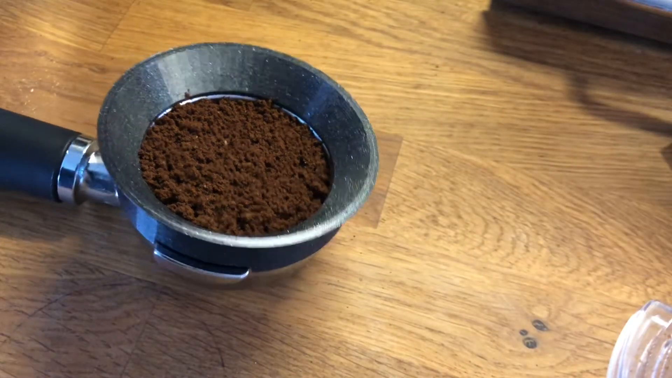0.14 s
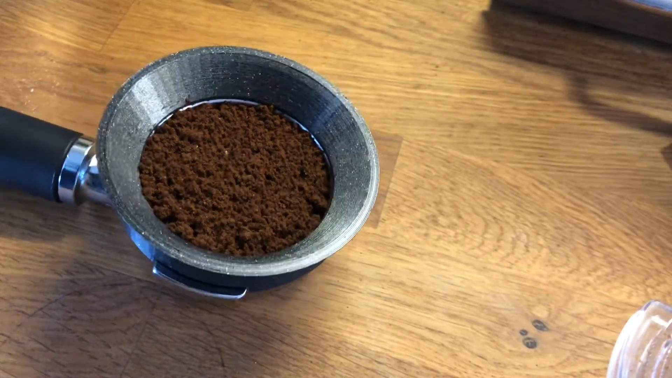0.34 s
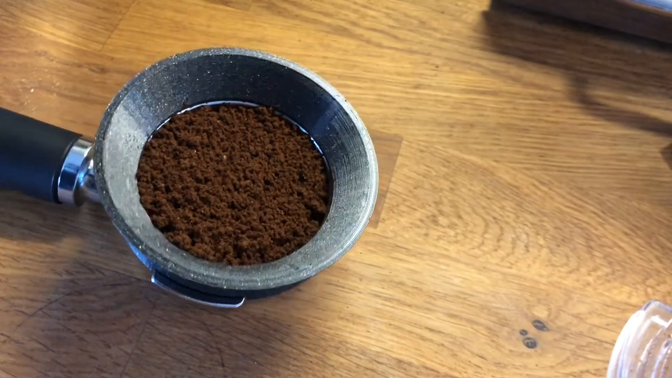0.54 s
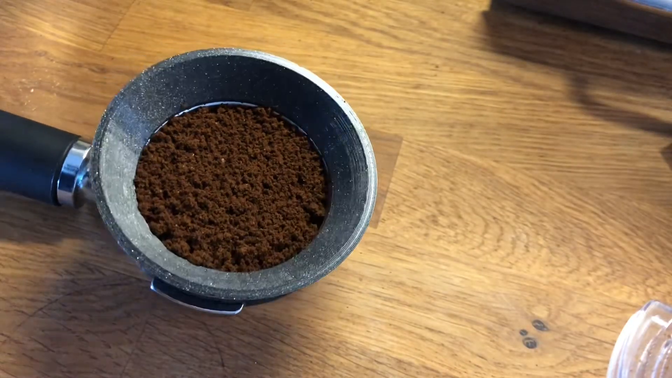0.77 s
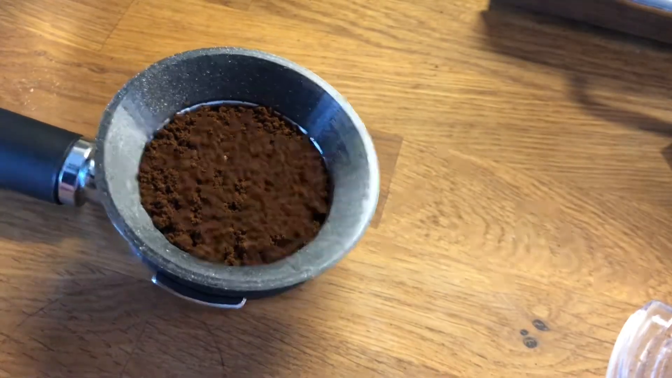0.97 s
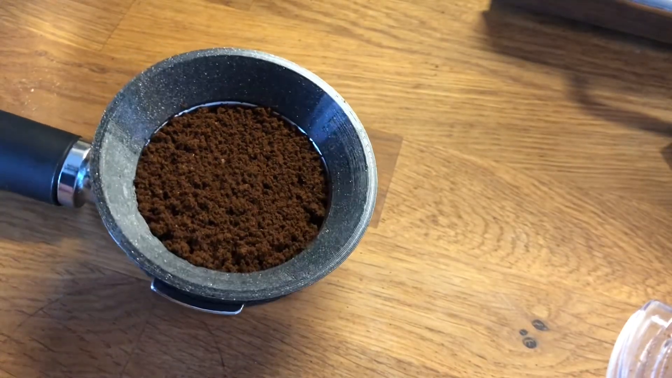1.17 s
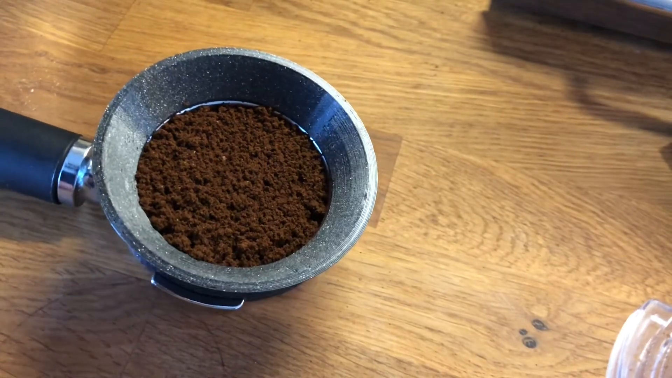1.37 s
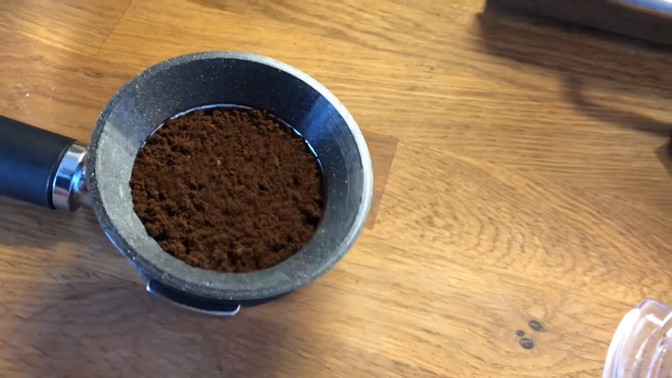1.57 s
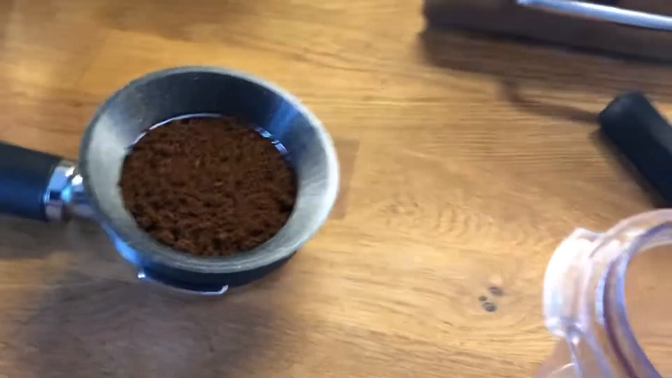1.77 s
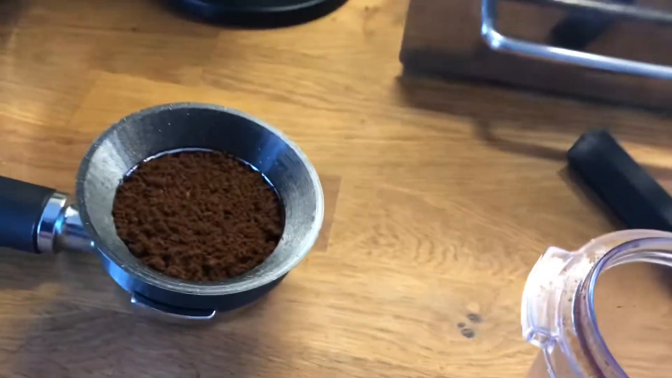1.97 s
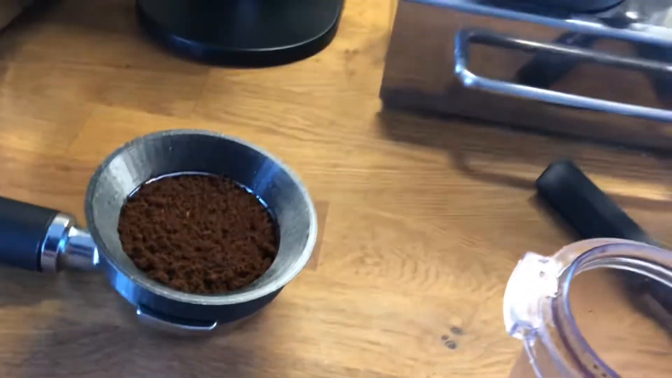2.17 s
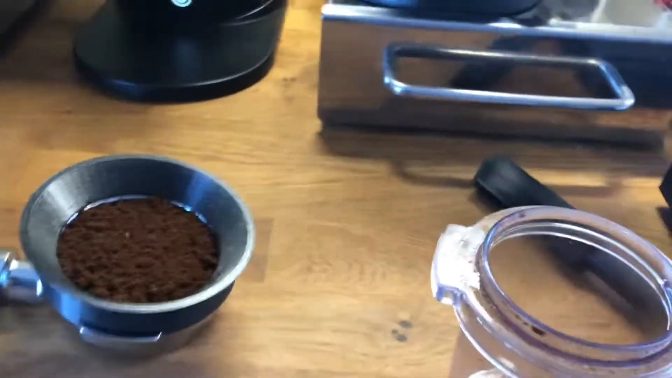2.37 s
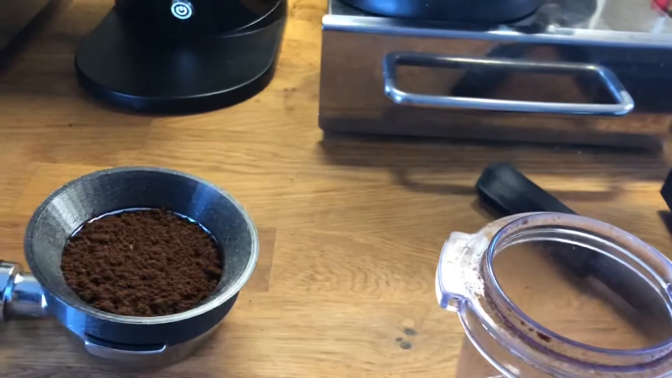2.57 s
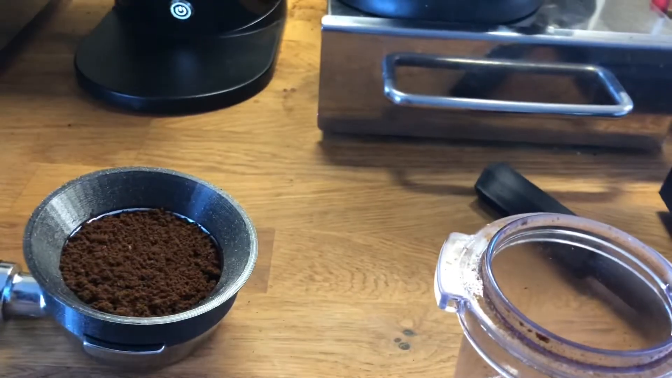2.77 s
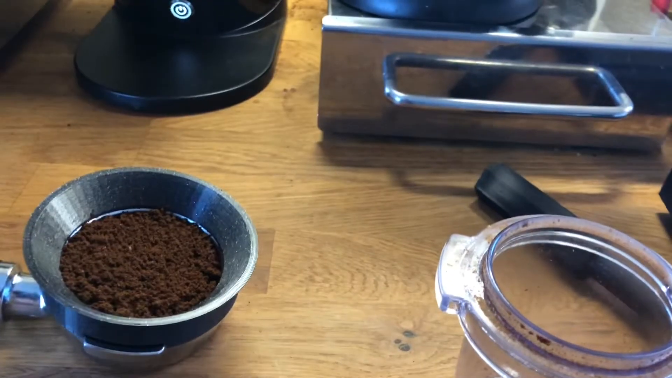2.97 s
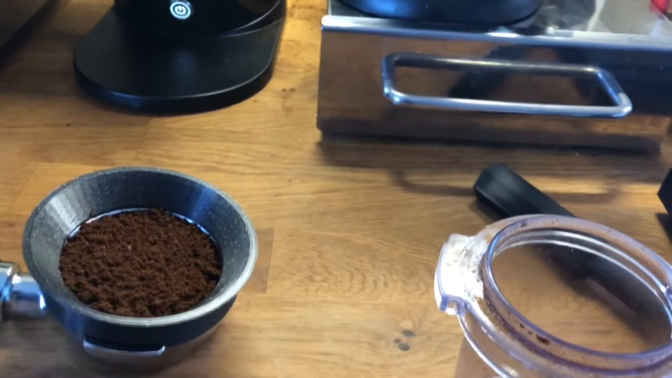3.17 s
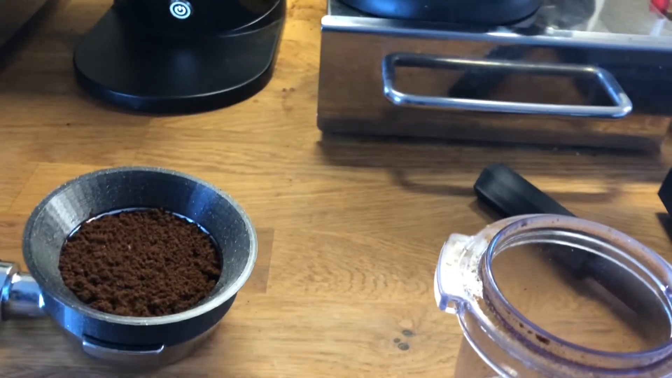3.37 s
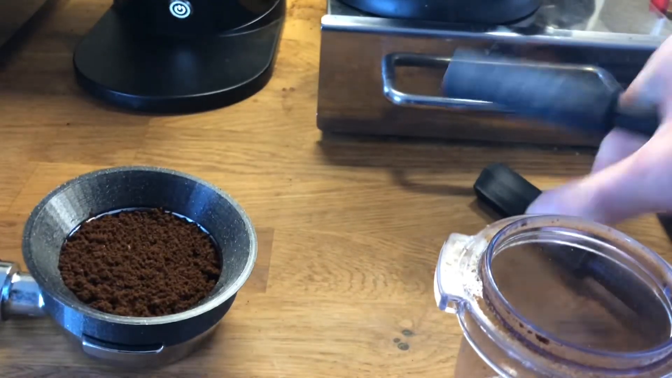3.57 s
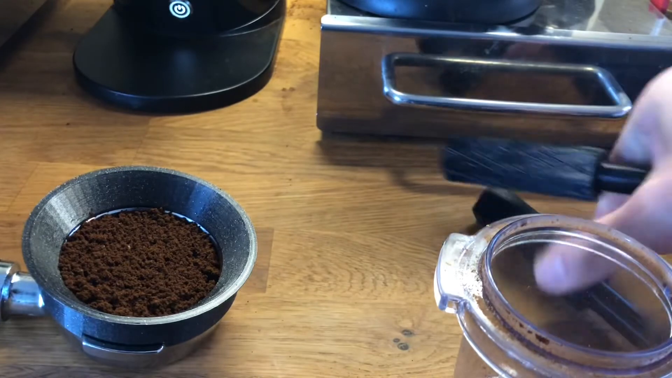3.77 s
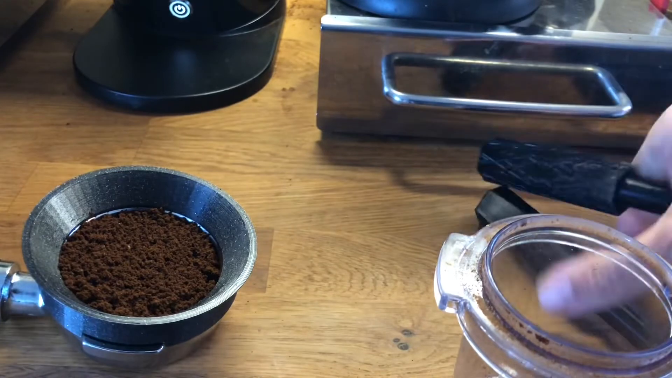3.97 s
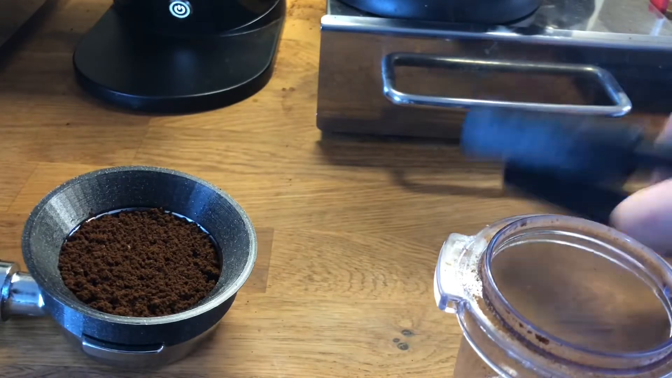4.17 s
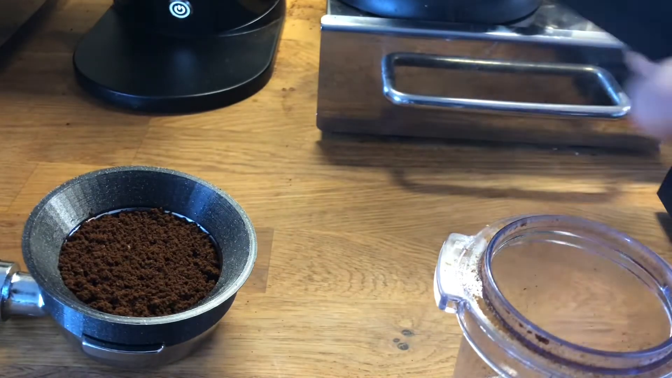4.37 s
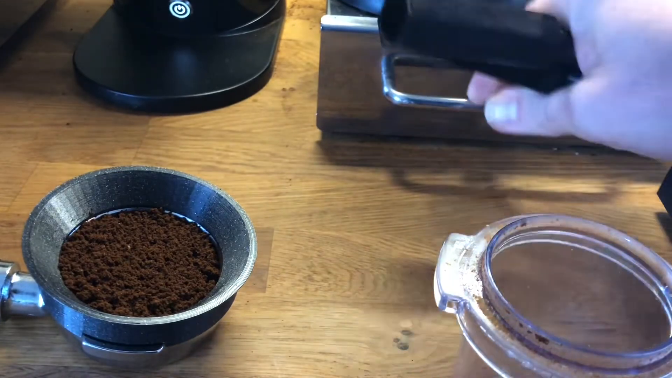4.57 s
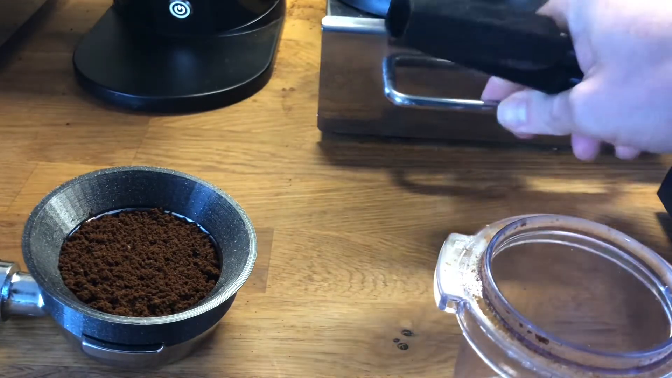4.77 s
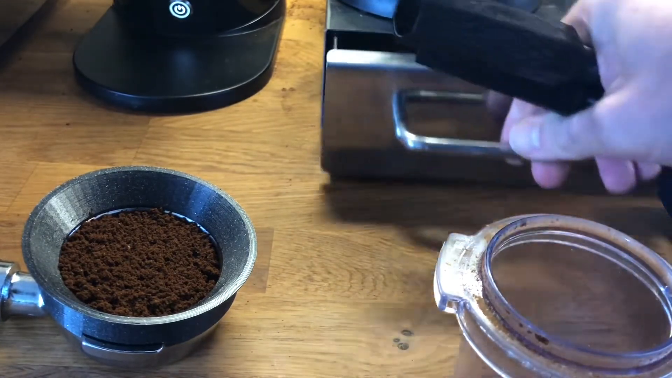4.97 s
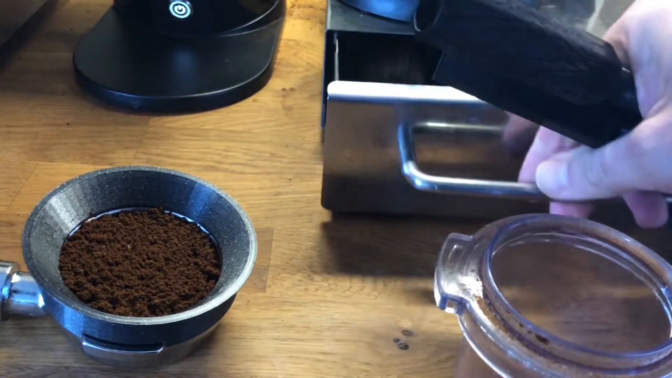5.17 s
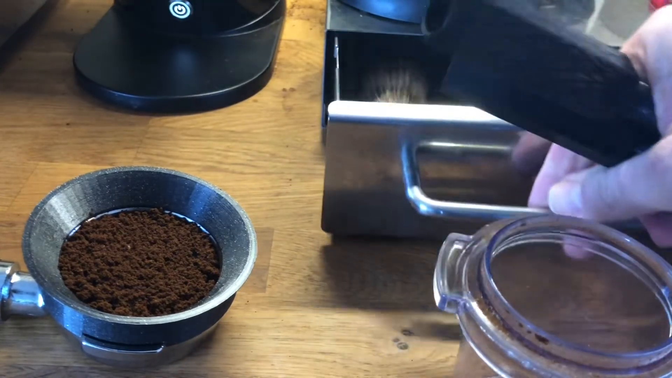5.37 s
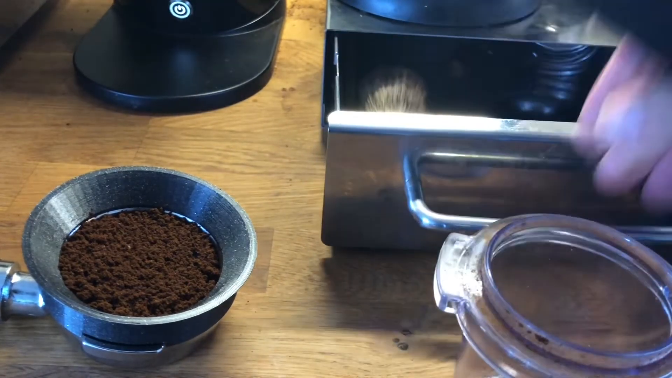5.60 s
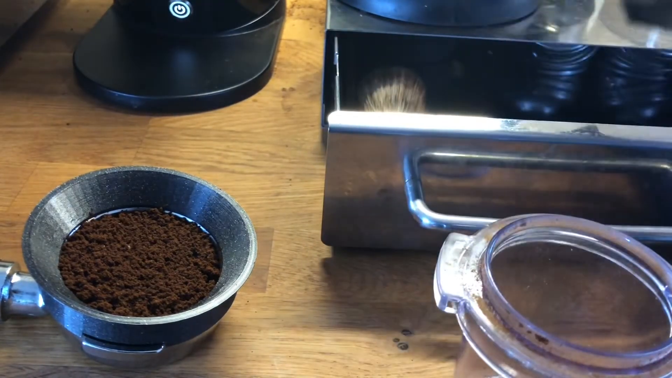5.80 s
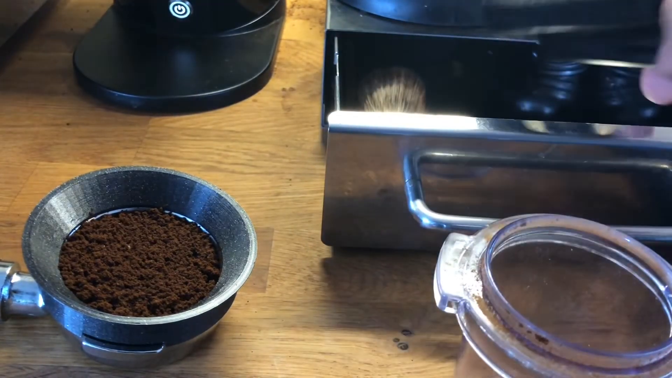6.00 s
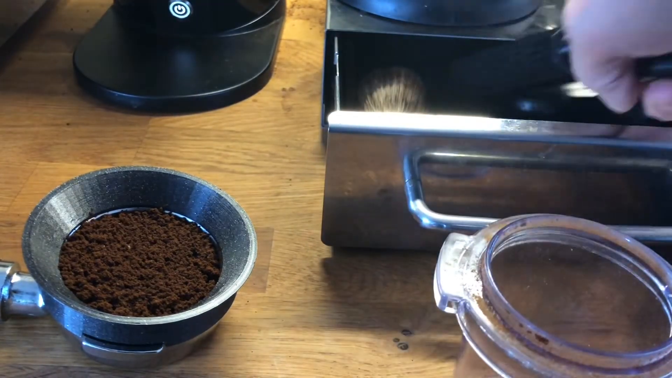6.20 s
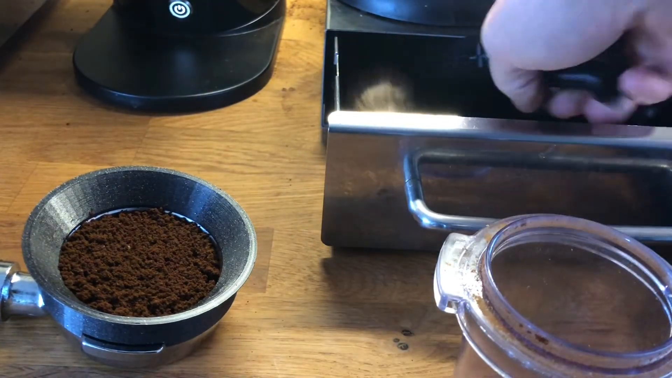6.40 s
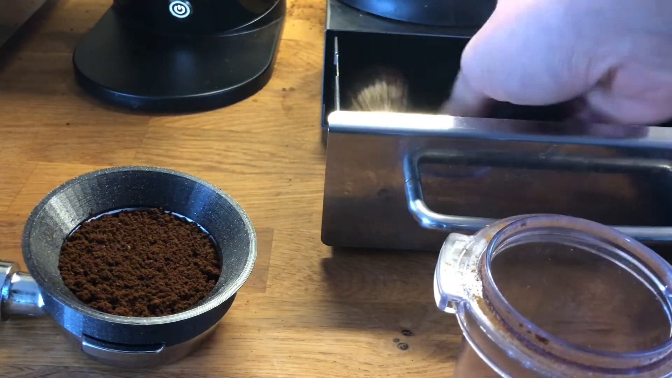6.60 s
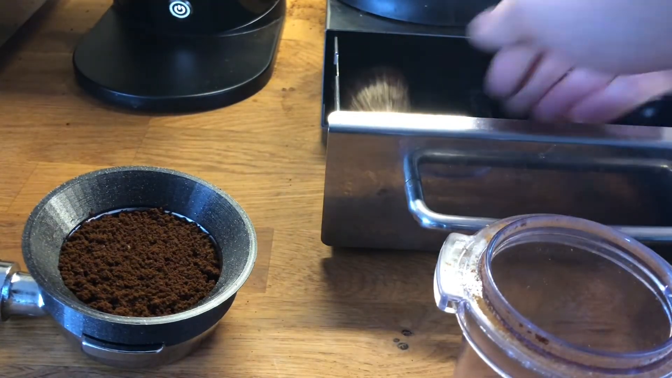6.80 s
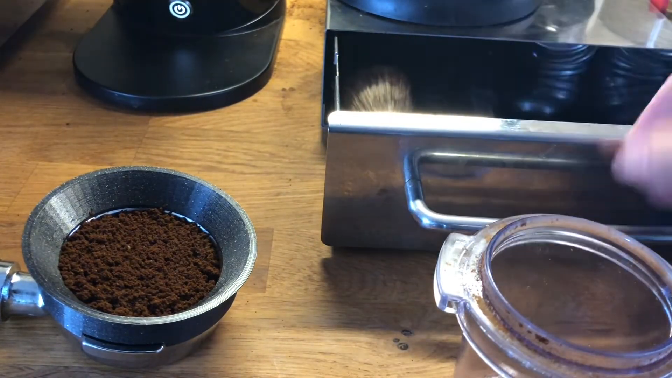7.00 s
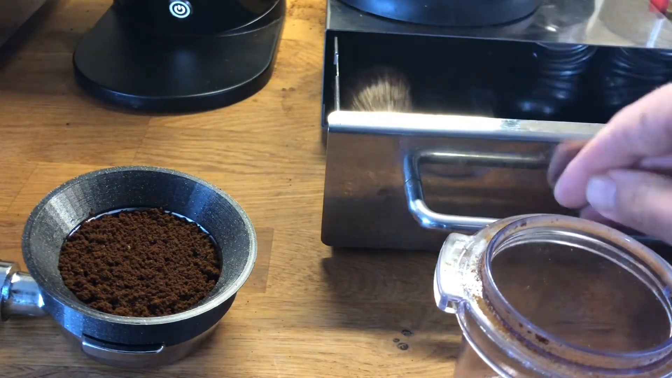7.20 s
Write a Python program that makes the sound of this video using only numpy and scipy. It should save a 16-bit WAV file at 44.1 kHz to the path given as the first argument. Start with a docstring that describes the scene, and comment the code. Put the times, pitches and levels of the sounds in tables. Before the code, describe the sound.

Close view of a quiet kitchen counter with faint low hum. A dull wooden thud, tiny taps, a short stuttering scrape and a sharper knock come first, then a soft slide. Two hard plastic tools clack together around four seconds. A steel drawer rumbles open with knocks, and the tools drop into it with loud, bright metallic clatter, fading in the small room. Small, slightly thin mono microphone.

```python
"""Small, quiet kitchen: small things are set down on a wooden counter and a stand is slid over it.
Two plastic tools are picked up and clack together; a steel drawer is pulled open and they drop into it.
Blows are short noisy pushes, slides are streams of tiny slips; both drive the resonances of the things.
The room answers with a decaying noise tail, over filtered-noise room tone and a low rumble."""
import sys
import numpy as np
from scipy import signal
from scipy.fft import rfft, irfft
from scipy.io import wavfile

SR = 44100
rng = np.random.default_rng(int(sys.argv[2]) if len(sys.argv) > 2 else 0)


def digitize_waveform(pressure):
    """Quantize a signal to 16-bit integers and store it at the path in sys.argv[1].

    Rows of a 2-D input are taken as channels; values are limited to [-1, 1].
    """
    field = np.atleast_2d(pressure).T
    bounded = np.clip(field, -1, 1)
    quanta = np.round(bounded * 32767).astype(np.int16)
    wavfile.write(sys.argv[1], SR, quanta)


N = 319725


def from_db(db):
    """Decibels to amplitude gain."""
    return 10 ** (np.asarray(db) / 20)


def rms_one(x):
    """Scales to unit rms."""
    return x / np.sqrt(np.mean(x ** 2) + 1e-30)


def at_hz(points, hz):
    """Interpolates (frequency [Hz], value) points on a log-frequency axis."""
    points = np.array(sorted(points))
    return np.interp(np.log(hz), np.log(points[:, 0]), points[:, 1])


def band(x, low_hz, high_hz):
    """Second-order Butterworth band-pass."""
    sos = signal.butter(2, [low_hz, high_hz], "band", fs=SR, output="sos")
    return signal.sosfilt(sos, x)


def drift(rate_hz):
    """Slow random wander of unit rms: noise through a two-pole low-pass, its start-up dropped."""
    r = np.exp(-2 * np.pi * rate_hz / SR)
    wander = signal.lfilter([1], [1, -2 * r, r * r], rng.standard_normal(N + SR))
    return rms_one(wander[SR:])


# room tone spectrum: (frequency [Hz], relative density [dB])
HUM_SPECTRUM = [(15, -33.5), (25, -8.5), (114, 3.5), (190, 4), (236, -0.5), (317, 0), (503, -8), (911, -16),
                (988, -14), (1700, -20), (4740, -24), (14800, -32.5), (16000, -32.5)]


def hum():
    """Room tone: noise shaped in the spectrum, wavering a little in level."""
    level_db, waver_db, waver_hz = -62.5, 1.2, 4
    hz = np.maximum(np.arange(N // 2 + 1) * SR / N, 1)
    spectrum = rfft(rng.standard_normal(N)) * from_db(at_hz(HUM_SPECTRUM, hz))
    tone = rms_one(irfft(spectrum, N))
    return from_db(level_db) * from_db(waver_db * drift(waver_hz)) * tone


# low rumble through the counter: (time [s], level [dB])
RUMBLE_LEVEL = [(0, -82.5), (1.9, -76), (2.4, -66.5), (3.1, -60), (3.502, -96), (4.249, -75), (5.35, -52.5),
                (5.65, -75)]


def rumble():
    """Low rumble through the counter: bass noise under a slow level curve."""
    time_s, level_db = np.transpose(RUMBLE_LEVEL)
    noise = rms_one(band(band(rng.standard_normal(N), 40, 130), 30, 130))
    return from_db(np.interp(np.arange(N) / SR, time_s, level_db)) * noise


def echoes(decays):
    """Noise tail of unit energy, dying band by band after (frequency [Hz], t60 [s]) points."""
    onset_s = 0.0016   # the first answers come late
    t = np.arange(SR // 2) / SR
    edges_hz = np.geomspace(60, 18000, num=13)
    tail = np.zeros(len(t))
    for low, high in zip(edges_hz, edges_hz[1:]):
        t60_s = at_hz(decays, np.sqrt(low * high))
        tail += band(rng.standard_normal(len(t)), low, high) * from_db(-60 * t / t60_s)
    tail *= 1 - np.exp(-t / onset_s)
    return tail / np.sqrt(np.sum(tail ** 2))


def wash(x, decays):
    """Dense answer of a body or room; two unlike tails are blended as the point of contact wanders."""
    turn = np.pi * drift(8)
    sides = (np.sin(turn), np.cos(turn))
    return sum(signal.fftconvolve(x * side, echoes(decays))[:N] for side in sides)


# room decay: (frequency [Hz], t60 [s])
ROOM_DECAY = [(150, .45), (1500, .42), (4000, .35), (8000, .3), (14000, .21)]


def kitchen(x):
    """Walls and tiles answer with a tail that dies faster in the treble."""
    level_db = -13.5
    return from_db(level_db) * wash(x, ROOM_DECAY)


# share of the contact time for clack, thud, knock, tick: (share [1])
PART_TIME_SHARE = [0.75, 1, 0.84, 0.75]


def blow_forces(blows, touch):
    """A blow is a one-way push with chatter, dying with the contact; one force row per part."""
    tick_follows = 0.15   # dB of tick per dB of clack over knock
    weight_slows = 0.11   # dB of contact time per dB of thud over clack
    push, click, rise_s = 0.21, 4.0, 0.00058
    contact_q, contact_ring = 6.26, 1.79   # sharpness and share of the contact's own pitch
    length = 4096
    forces, t = np.zeros((4, N + length)), np.arange(length) / SR
    tick_db, per_octave_db, contact_s = touch
    for time_s, clack, thud, knock, pitch_hz in blows:
        tick = clack + tick_db + tick_follows * (clack - knock)
        tick += per_octave_db * np.log2(pitch_hz / 2000)
        weight = from_db(weight_slows * (thud - clack + 18))
        decay_s = contact_s * weight * np.array(PART_TIME_SHARE)[:, None]
        chatter = rng.standard_normal(length)   # common to the four parts
        burst = (push + chatter) * np.exp(-t / decay_s) * (1 - np.exp(-t / rise_s))
        burst[:, 1] += click   # hard first touch
        b, a = signal.iirpeak(pitch_hz, contact_q, fs=SR)
        burst += contact_ring * signal.lfilter(b, a, burst)
        at = round(time_s * SR)
        forces[:, at:at + length] += from_db([clack, thud, knock, tick])[:, None] * burst
    return forces[:, :N]


def rub_forces(strokes, colour, slips_per_s, uneven_db, lumps_hz=30):
    """Sliding is a dense stream of tiny uneven slips, silent between strokes."""
    happens = rng.random(N) < slips_per_s / SR
    slips = happens * rng.standard_normal(N) * from_db(uneven_db * drift(lumps_hz))
    parts = [(0, 0.013)] + colour   # clack is the reference
    level = np.zeros((4, N))
    for rows in strokes:
        time_s, level_db, bright_db = np.transpose(rows)
        at = np.arange(round(time_s[0] * SR), min(round(time_s[-1] * SR), N))
        for part, (share_db, gain) in enumerate(parts):
            part_db = level_db + share_db + gain * bright_db
            level[part, at] += from_db(np.interp(at / SR, time_s, part_db))
    return level * rms_one(slips)


def swells(scuffs):
    """Start, peak and end points of each scuff; an early end cuts it short, or silences it."""
    rise_db, fall_db = 13, 20.5
    return [[(start, db - rise_db, bright), (peak, db, bright), (end, db - fall_db, bright)]
            for start, peak, end, db, bright in scuffs]


# bands of clack, thud, knock, tick: (low edge [Hz], high edge [Hz])
PART_BANDS = [(1300, 5300), (140, 450), (450, 1300), (4700, 17000)]
# softness of the contact, same four parts: (frequency above which the part falls off [Hz])
PART_KNEES = [1740, 587, 900, 7200]


def body(modes, forces):
    """The contact is heard as a broad crack or scratch, louder where the body resonates."""
    wander_db, wander_hz = 2, 12   # the touched spot changes, so mode strengths do
    contact = np.zeros(N)
    for (low, high), knee_hz, force in zip(PART_BANDS, PART_KNEES, forces):
        # noise bandwidth left by band and knee
        kept_hz = knee_hz * (np.arctan(high / knee_hz) - np.arctan(low / knee_hz))
        band_sos = signal.butter(5, [low, high], "band", fs=SR, output="sos")
        knee_sos = signal.butter(1, knee_hz, fs=SR, output="sos")
        scaled = np.sqrt(SR / 2 / kept_hz) * force + 1e-18
        contact += signal.sosfilt(np.vstack([band_sos, knee_sos]), scaled)
    out = contact.copy()
    for hz, width_hz, db in modes:
        r = np.exp(-np.pi * width_hz / SR)
        gain = from_db(db) * (1 - r * r) / 2
        poles = [1, -2 * r * np.cos(2 * np.pi * hz / SR), r * r]
        drive = contact * from_db(wander_db * drift(wander_hz))
        out += signal.lfilter([gain, 0, -gain], poles, drive)
    return out


# blows on the counter: (time [s], relative clack [dB], thud [dB], knock [dB], contact pitch [Hz])
COUNTER_HITS = [(0.1403, -44.5, -20.5, -22.5, 813), (0.4463, -61.5, -76, -89, 4140),
                (0.9298, -53, -35, -54, 1570), (1.054, -57.5, -43.5, -55, 1280),
                (1.1952, -65, -40.5, -71, 3500), (1.2477, -58.5, -33.5, -62, 6100),
                (1.2935, -63, -35.5, -58, 5000), (1.5479, -46, -40, -46, 1340),
                (1.5872, -49, -25, -56, 740), (1.6099, -26.5, -59, -26.5, 1300),
                (1.6525, -36, -34.5, -37.5, 1350), (2.6268, -34, -34, -31.5, 1570),
                (2.6434, -41, -67, -39, 1720), (2.835, -75, -42, -76, 1050),
                (2.9897, -46, -27.5, -44.5, 13200), (3.1564, -62, -61, -56, 1110),
                (3.1944, -42, -50, -43, 6640), (4.575, -45, -34, -33.5, 1000),
                (4.5871, -41.5, -34, -57, 1030)]
# touch: (tick against clack [dB], tick per octave of pitch [dB], base contact time [s])
COUNTER_CONTACT = (-9, 5.7, 0.0047)
# hand scuffs: (start [s], peak [s], end [s], relative level [dB], brightness [dB])
COUNTER_SCUFFS = [(3.1, 3.12, 3.15, -66.5, 9), (3.193, 3.2, 3.297, -45.5, -3), (3.24, 3.3, 3.76, -63.5, 4)]
# rub colour of thud, knock, tick: (level against clack [dB], gain per brightness [dB/dB])
HAND_COLOUR = [(-7, -0.73), (-1, -0.64), (0, .9)]
# wood resonances: (frequency [Hz], width [Hz], strength [dB])
COUNTER_MODES = [(169.3, 8.1, 9.5), (257.4, 14, 10), (503, 80, -10.5), (724, 53, 4), (780, 300, -3.5),
                 (1290, 90, -0.5), (1730, 71, 2), (1460, 960, -0.5)]


def counter():
    """Wooden counter: small things knock on it, a hand scuffs it."""
    hits = blow_forces(COUNTER_HITS, COUNTER_CONTACT)
    scuffs = rub_forces(swells(COUNTER_SCUFFS), HAND_COLOUR, slips_per_s=6400, uneven_db=0.0)
    return body(COUNTER_MODES, hits + scuffs)


# stick-slip of the stand's feet: (time [s], slip rate [1/s], depth [0-1])
STICK_SLIP = [(1.3, 165, 0.7), (1.33, 194, 0.6), (1.433, 175, 0.4), (1.442, 84, 0), (1.482, 87, 0.96),
              (1.49, 140, 0.2)]


def judder():
    """Gate that opens briefly at every slip of a slightly uneven stick-slip cycle."""
    time_s, slips_per_s, depth = np.transpose(STICK_SLIP)
    t = np.arange(N) / SR
    rate = np.interp(t, time_s, slips_per_s) * from_db(0.28 * drift(28))
    cycle = np.cumsum(rate) / SR % 1
    depth = np.clip(np.interp(t, time_s, depth), 0, 1)
    return 1 - depth + depth * 3.5 * np.exp(-cycle / 0.15)


# nudges: (start [s], peak [s], end [s], relative level [dB], brightness [dB])
NUDGES = [(0.94, 0.95, 1.05, -55, 4.6)]
# long slides, one list each: (time [s], relative level [dB], brightness [dB])
SLIDES = [
    [(1.16, -78, -18.5), (1.23, -84, -9.5), (1.31, -65.5, -2.5), (1.4, -63.5, -7.5), (1.46, -59, -0.5),
     (1.48, -63, -3.5), (1.52, -96, 5)],
    [(1.67, -51, 14), (1.8, -70.5, 2.5), (1.95, -67, 5), (2.05, -60, 4.5), (2.15, -65.5, 6.5),
     (2.3, -59.5, 2.5), (2.34, -72, 18), (2.38, -86, -18)],
]
# rub colour of thud, knock, tick: (level against clack [dB], gain per brightness [dB/dB])
STAND_COLOUR = [(13.5, -1.1), (7.5, -0.71), (-15, -1.2)]
# stand resonances: (frequency [Hz], width [Hz], strength [dB])
STAND_MODES = [(173.5, 21, 16.5), (442, 35, 1.2), (763, 14, 1.6), (1700, 66, 3.9), (2335, 130, 9),
               (4770, 320, 3.8), (6060, 300, 15.3)]


def stand():
    """Stand slid over the counter: sticking, slipping feet drive its resonances."""
    strokes = swells(NUDGES) + SLIDES
    rub = rub_forces(strokes, STAND_COLOUR, slips_per_s=9000, uneven_db=0.3)
    return body(STAND_MODES, judder() * rub)


# tool clacks: (time [s], relative clack [dB], thud [dB], knock [dB], contact pitch [Hz])
TOOL_HITS = [(3.6209, -38.5, -31, -29.5, 1300), (3.907, -25, -33, -21, 4540), (3.9657, -53, -42, -29, 1350),
             (3.9866, -33.5, -25, -30.5, 2700), (4.0034, -26, -41, -24.5, 4087),
             (4.0118, -16.5, -29, -17, 1140), (4.056, -41, -60, -55, 4070), (4.068, -31, -56, -31, 4200),
             (4.0876, -36, -63, -35, 4100), (4.0954, -35, -39, -54, 4200), (4.1896, -42.5, -68, -84, 4130),
             (4.211, -47.5, -79, -94, 6260), (4.317, -45, -70, -45.5, 7200),
             (4.3261, -34.5, -85, -41.5, 7100), (4.332, -31.5, -72, -50, 2590),
             (4.4377, -48.5, -68, -53.5, 2770), (5.5726, -50, -36, -42.5, 1050),
             (5.633, -37, -61, -99, 4400), (5.6435, -36.5, -68, -47, 3560), (5.7454, -27.5, -56, -43, 3300),
             (5.783, -35.5, -70, -45, 3500), (5.8119, -32, -60, -44, 7260)]
# touch: (tick against clack [dB], tick per octave of pitch [dB], base contact time [s])
TOOL_CONTACT = (-6, 2.5, .005)
# scuffs: (start [s], peak [s], end [s], relative level [dB], brightness [dB])
TOOL_RUBS = [(3.598, 3.625, 3.77, -54, 12.5), (3.68, 3.73, 3.86, -51, -6.5), (3.925, 4.04, 3.92, -29.5, -4),
             (4.11, 4.14, 4.18, -50, 3), (4.15, 4.17, 4.4, -67, 17), (4.276, 4.281, 4.35, -56, 23),
             (4.34, 4.38, 4.31, -66, -7.5), (4.45, 4.51, 4.68, -66.5, 15.5), (5.585, 5.68, 5.67, -44, 4),
             (5.72, 5.75, 5.73, -33, 1.5), (5.86, 5.885, 5.87, -35.5, 3.5), (5.92, 5.96, 6.0, -72, 14),
             (6.1, 6.22, 6.37, -75, 15)]
# rub colour of thud, knock, tick: (level against clack [dB], gain per brightness [dB/dB])
TOOL_COLOUR = [(-10, -3.65), (-5.5, -2.1), (-3, 0.89)]
# plastic resonances: (frequency [Hz], width [Hz], strength [dB])
TOOL_MODES = [(340, 30, 2.8), (830, 52, 4.8), (1150, 18, 7.1), (2506, 70, 1.3), (3570, 130, 2.6),
              (4195, 114, 10.3), (6230, 73, 9.9), (6580, 350, 3.3), (7230, 160, 4.2)]


def tools():
    """Two plastic tools: clacks and scuffs drive their resonances."""
    hits = blow_forces(TOOL_HITS, TOOL_CONTACT)
    scuffs = rub_forces(swells(TOOL_RUBS), TOOL_COLOUR, slips_per_s=6500, uneven_db=1.0, lumps_hz=390)
    return body(TOOL_MODES, hits + scuffs)


# panel decay: (frequency [Hz], t60 [s])
PANEL_DECAY = [(200, 0.25), (1000, 0.13), (4000, 0.085), (12000, 0.062)]


def sheet_steel(x):
    """The drawer's panels add countless close modes, heard as a short wash."""
    panel_db = -8
    return x + from_db(panel_db) * wash(x, PANEL_DECAY)


# drawer blows: (time [s], relative clack [dB], thud [dB], knock [dB], contact pitch [Hz])
DRAWER_HITS = [(4.8079, -20.5, -24.5, -22.5, 806), (4.9921, -21, -19, -17.5, 14000),
               (5.0534, -23, -43, -20.5, 1170), (5.0813, -32, -29, -22.5, 930),
               (5.1191, -28.5, -46, -22, 1156), (5.2046, -30.5, -27, -30.5, 1220),
               (5.225, -40, -55, -50, 1900), (5.259, -48, -57, -36, 780), (5.2724, -37, -48, -34.5, 1200),
               (5.3285, -46, -42, -45, 880), (5.41, -54.5, -74, -83, 6000), (6.3175, -27, -18, -27.5, 955),
               (6.376, -26, -24.5, -23, 1336), (6.438, -11.5, -18.5, -9.5, 2450),
               (6.5475, -12.5, -38.5, -13, 1913), (6.6258, -8, -22.5, -15.5, 6200),
               (6.6593, -8.5, -35, -10.5, 3000), (6.8094, -33, -59, -40, 1254),
               (6.8803, -42, -49.5, -38.5, 950.2), (7.0215, -63, -45, -57.5, 747),
               (7.1122, -57, -56, -50, 1030)]
# touch: (tick against clack [dB], tick per octave of pitch [dB], base contact time [s])
DRAWER_CONTACT = (-3, 2.5, .0055)
# rattles: (start [s], peak [s], end [s], relative level [dB], brightness [dB])
RATTLES = [(6.33, 6.36, 6.53, -41, 3), (6.632, 6.675, 6.7, -17.5, 14.5), (7.22, 7.245, 7.3, -54, 0)]
# slide on the runners: (time [s], relative level [dB], brightness [dB])
RUNNER_SLIDE = [(4.74, -76, 2), (4.77, -58, 5.5), (4.8, -50.5, 2), (4.85, -45, 1), (4.97, -44, 9),
                (5.03, -53, -7), (5.12, -64, -23), (5.19, -48.5, -6.5), (5.25, -48.5, -11), (5.3, -51, 1.5),
                (5.36, -59.5, 1), (5.54, -66.5, 6)]
# rub colour of thud, knock, tick: (level against clack [dB], gain per brightness [dB/dB])
DRAWER_COLOUR = [(1.5, -1.07), (5.5, -0.65), (-1, -0.29)]
# steel resonances: (frequency [Hz], width [Hz], strength [dB])
DRAWER_MODES = [(227.5, 6.7, 1.6), (280, 41, 6.6), (427.7, 11, 1.3), (663, 27, 1.7), (765, 13, 3.3),
                (967, 130, 2.5), (1324, 190, 6), (1600, 6.7, 6.6), (1844, 23, 1.5), (2722, 170, 0.61),
                (3300, 220, 1.5)]


def drawer():
    """Steel drawer: blows, rattles and the runner slide ring its modes and panels."""
    hits = blow_forces(DRAWER_HITS, DRAWER_CONTACT)
    strokes = swells(RATTLES) + [RUNNER_SLIDE]
    rub = rub_forces(strokes, DRAWER_COLOUR, slips_per_s=4000, uneven_db=2.1, lumps_hz=19)
    return sheet_steel(body(DRAWER_MODES, hits + rub))


def scene():
    """Counter, sliding stand, tools and drawer, with the room's answer, hum and rumble."""
    things = from_db(-5.0) * counter()
    things += from_db(-7.5) * stand()
    things += from_db(-6) * tools()
    things += from_db(-3.5) * drawer()
    mix = things + kitchen(things) + hum() + rumble()
    return mix[None]


def record(dry):
    """Small microphone: deep bass lost, top treble lifted, peaks rounded, the top cut."""
    bass_cut_hz, top_cut_hz = 56.5, 16800
    lift_hz, lift_width_hz, lift_share = 15900, 3400, 0.59
    ceiling = 0.98
    thin = signal.sosfilt(signal.butter(2, bass_cut_hz, "high", fs=SR, output="sos"), dry)
    b, a = signal.iirpeak(lift_hz, lift_hz / lift_width_hz, fs=SR)
    lifted = thin + lift_share * signal.lfilter(b, a, thin)
    rounded = ceiling * np.tanh(lifted / ceiling)
    return signal.sosfilt(signal.cheby2(14, 80, top_cut_hz, fs=SR, output="sos"), rounded)


dry = scene()
out = record(dry)
digitize_waveform(out)
```